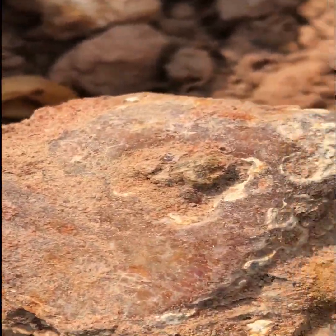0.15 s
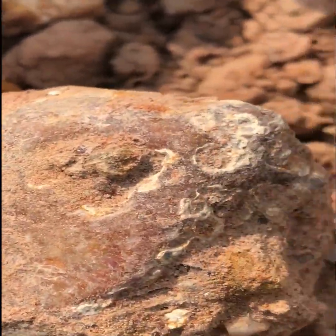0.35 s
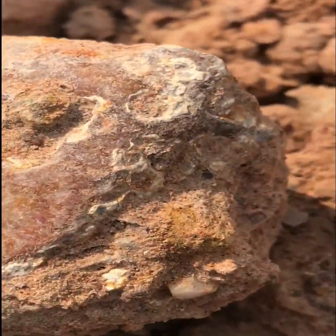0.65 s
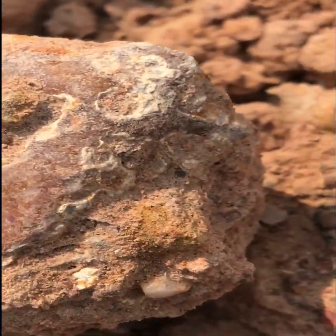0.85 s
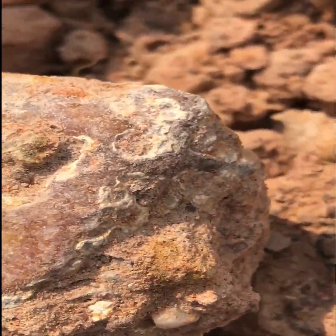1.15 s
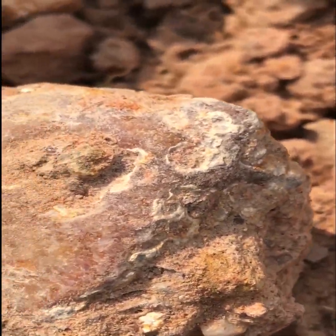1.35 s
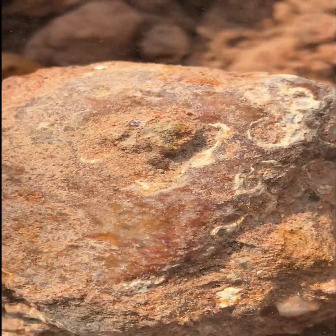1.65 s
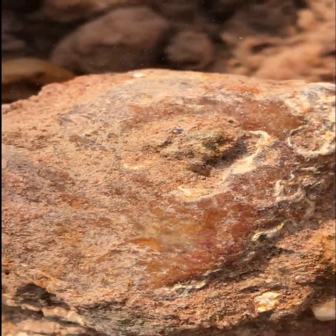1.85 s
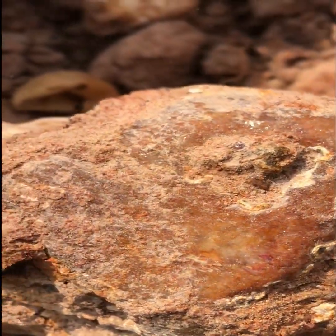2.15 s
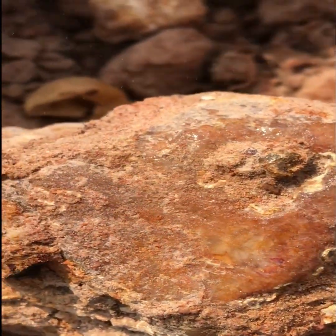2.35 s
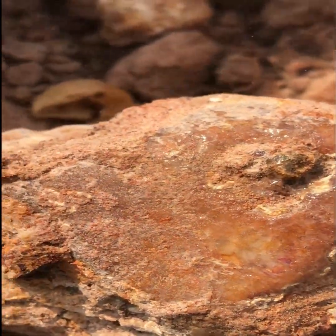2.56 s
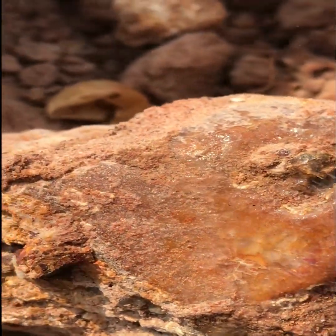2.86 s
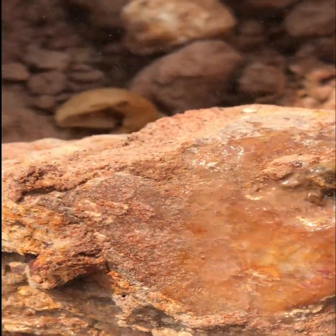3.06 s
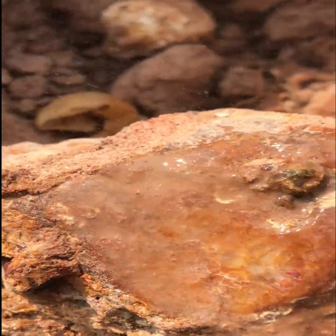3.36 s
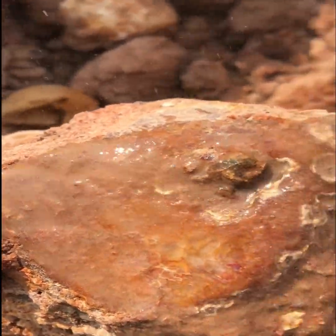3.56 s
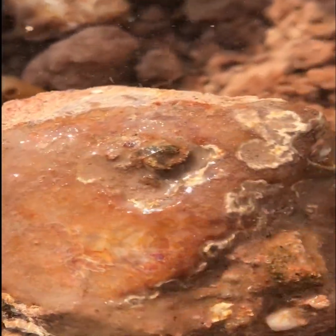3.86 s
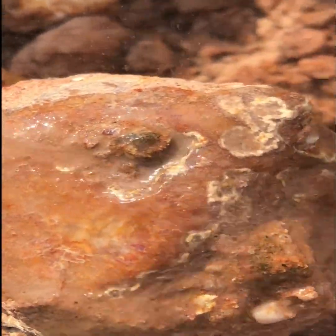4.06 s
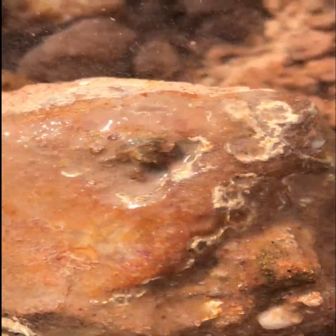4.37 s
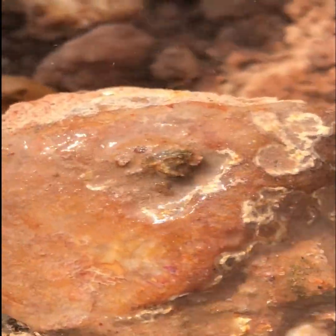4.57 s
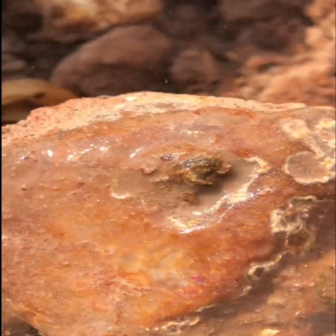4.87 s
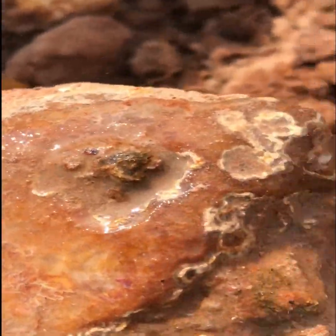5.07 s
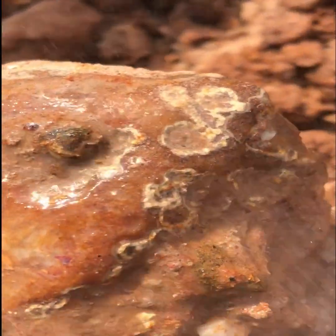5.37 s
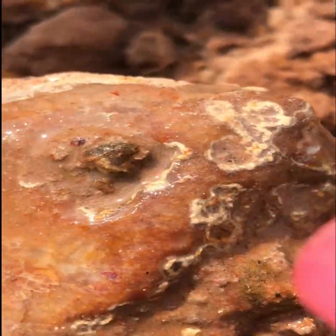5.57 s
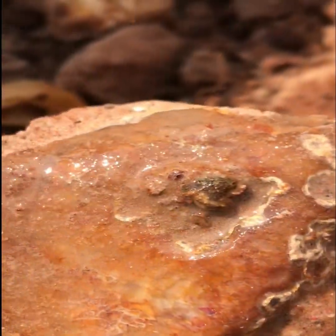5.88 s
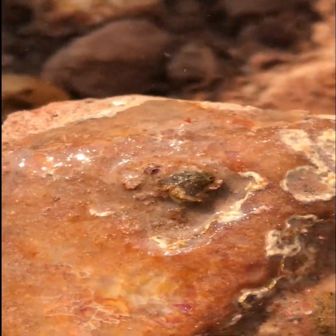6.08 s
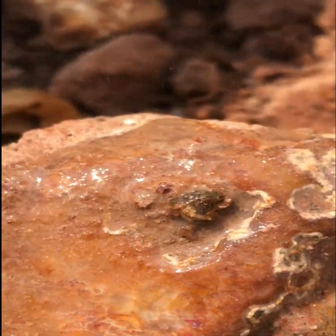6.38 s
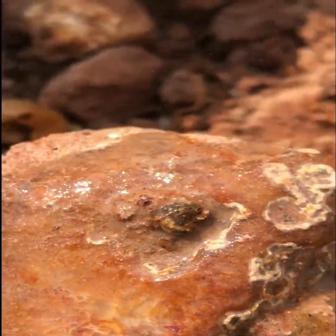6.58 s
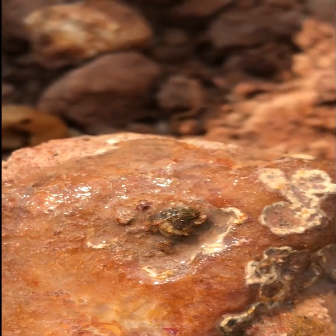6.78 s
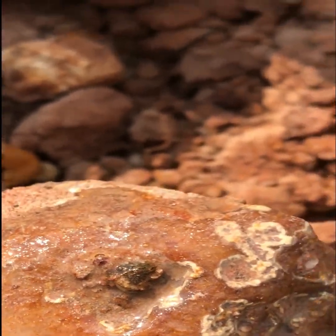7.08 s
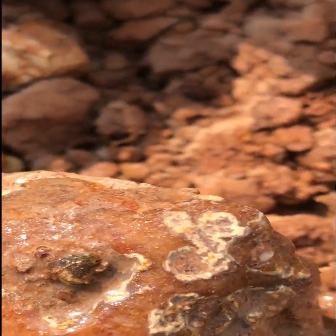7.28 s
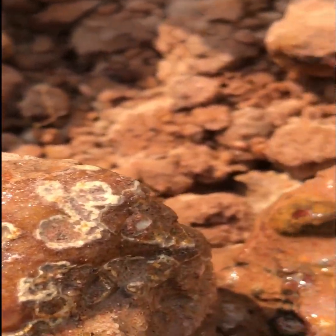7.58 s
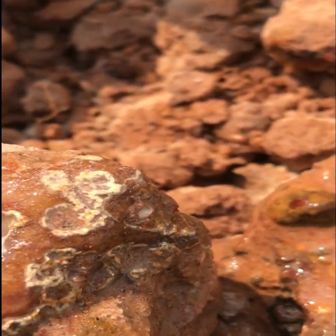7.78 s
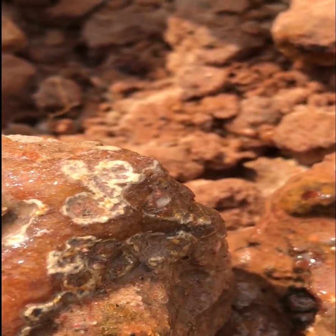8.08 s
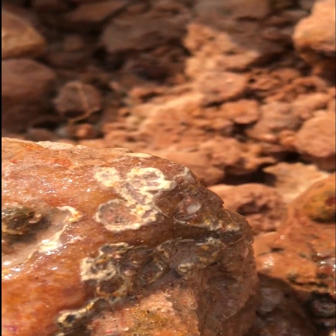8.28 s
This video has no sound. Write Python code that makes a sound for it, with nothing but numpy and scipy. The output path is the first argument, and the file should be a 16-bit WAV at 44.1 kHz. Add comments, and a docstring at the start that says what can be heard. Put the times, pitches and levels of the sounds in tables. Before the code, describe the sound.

Quick bright spritzes from a trigger sprayer splash on stone, valve ticking between them, framed by handling rustles, clicks and a knock.

```python
"""Hand spray bottle pumped fast onto a rock

Outdoors, a trigger is squeezed over and over: shaped noise hisses and splashes, broken by bright humps of spitting air.
Each release gurgles with random bubble pops and wheezes, while the valve ticks in decaying noise and ringing resonances.
Fingers snap, rustle and tick on plastic, the camera body is knocked, and the trigger hinge squeaks.
Swept low cycles bump the microphone as wind over rumble and faint hiss; a far bird sings swept sines with echoes."""
import sys
import numpy as np
from scipy import signal
from scipy.fft import rfft, irfft, next_fast_len
from scipy.io import wavfile
from scipy.ndimage import uniform_filter1d, minimum_filter1d, map_coordinates

SR = 44100
rng = np.random.default_rng(int(sys.argv[2]) if len(sys.argv) > 2 else 0)


def transcribe(u):
    """Save the signal u as a 16-bit wav file named by the first command-line argument.

    u: samples, shape (n,) or (channels, n), limited to [-1, 1]; the rate is SR.
    q: integer samples, one column per channel.
    """
    v = np.clip(np.atleast_2d(u).T, -1, 1)
    q = np.round(v * 32767).astype(np.int16)
    wavfile.write(sys.argv[1], SR, q)


N = 371763
T = np.arange(N) / SR  # time [s]

# trigger squeezes: start_s, end_s, air_s (until the last air is out), opening_db (hiss as the valve opens),
# full_db (hiss at full pressure), splash_db (base level of the splash)
SQUEEZES = [(1.576, 1.751, .036, -28, -29, -29), (1.88, 2.041, 0.11, -22, -22.5, -27.5),
            (2.181, 2.329, 0.12, -23, -18, -29), (2.459, 2.607, .073, -34, -18, -26.5),
            (2.747, 2.888, 0.089, -18.5, -18.5, -27), (3.007, 3.151, .057, -22, -17.5, -26),
            (3.269, 3.403, 0.093, -26, -20, -25.5), (3.516, 3.652, .09, -26, -22, -26),
            (3.766, 3.908, .033, -24, -20.5, -25), (4.019, 4.162, .068, -23.5, -20.5, -25),
            (4.273, 4.421, 0.036, -24.5, -19.5, -25.5), (4.538, 4.687, .061, -19.5, -19.5, -25.5),
            (4.81, 4.963, .066, -20, -18, -25.5), (5.094, 5.25, .046, -19, -17, -24.5),
            (5.378, 5.532, 0.066, -17.5, -17, -22.5), (5.646, 5.797, .084, -18, -17.5, -22),
            (5.92, 6.061, .077, -20, -18.5, -24.5), (6.179, 6.319, 0.07, -16.5, -16.5, -23.5)]
# relative colour of the nozzle noise: freq_hz, density_db (per Hz)
NOZZLE_COLOUR = [(1500, -25), (3000, -11), (5400, -5.5), (9200, -6), (12500, -3), (15300, 2.5),
                 (16500, -7.5)]
# relative colour of rustling cloth: freq_hz, density_db (per Hz)
CLOTH_COLOUR = [(470, -21), (800, -19.5), (2450, -26.5), (4090, -14.5), (4810, -16), (12200, -8),
                (15700, -1.5)]
# resonances of the pump head: freq_hz, width_hz, level_db
PUMP_MODES = [(162, 52, -5), (1360, 300, -5), (2790, 330, 3), (5140, 1500, 0), (9430, 740, 2.5)]


def amp(db):
    """Decibels to gain."""
    return 10 ** (np.asarray(db) / 20)


def unit(x):
    """Scaled to rms 1."""
    return x / np.sqrt(np.mean(x ** 2) + 1e-20)


def even(x):
    """Noise whose short-time loudness is held steady, so that a burst keeps its size."""
    power = np.abs(uniform_filter1d(x ** 2, size=130))
    return x / np.sqrt(power + 1e-3)


def filtered(x, response):
    """x shaped by a complex response of frequency, padded so that tails do not wrap."""
    m = next_fast_len(len(x) + 8192)
    spectrum = rfft(x, m) * response(np.fft.rfftfreq(m, 1 / SR))
    return irfft(spectrum, m)[:len(x)]


def ringing(modes):
    """Causal response of (freq_hz, width_hz, level_db) resonances with alternating sign."""
    def response(f):
        total = 0
        for k, (centre, width, db) in enumerate(modes):
            damping = 1j * f * width
            total = total + (-1) ** k * amp(db) * damping / (centre * centre - f * f + damping)
        return total
    return response


def rung_noise(modes):
    """White noise shaken through resonances, rms 1."""
    return unit(filtered(rng.standard_normal(N), ringing(modes)))


def wobble(rate_hz):
    """A smooth random curve with rate_hz knots a second."""
    knots = rng.standard_normal(int(N * rate_hz / SR) + 4)
    return map_coordinates(knots, [T * rate_hz])


def noise(colour, patchy_db=0., size=4):
    """Coloured noise of rms 1 with patches of random gain, smoothed over size frames of 1.5 ms."""
    z = signal.stft(rng.standard_normal(N), nperseg=128)[2]
    field = uniform_filter1d(rng.standard_normal(z.shape), size=4, axis=0)
    field = uniform_filter1d(field, size=size, axis=1)
    patchy = signal.istft(z * amp(patchy_db * unit(field)), nperseg=128)[1][:N]
    f, db = np.transpose(colour)
    return unit(filtered(patchy, lambda hz: amp(np.interp(np.log(hz + 1), np.log(f), db))))


def decays(rows, t60_s):
    """Envelope: a sudden rise at each (start_s, level_db), falling 60 dB in t60_s, cut off after 1/8 s."""
    env, t = np.zeros(N + SR), T[:SR // 8]
    for (s, db), life in zip(rows, np.broadcast_to(t60_s, len(rows))):
        env[round(s * SR):][:len(t)] += amp(db - 60 * t / life)
    return env[:N]


def swells(rows, power=2):
    """Envelope: a hump at each (centre_s, level_db, half_s); a higher power flattens its top."""
    env = np.zeros(N)
    for s, db, half in rows:
        near = slice(max(0, int((s - 4 * half) * SR)), int((s + 4 * half) * SR))
        env[near] += amp(db) * np.exp(-np.abs((T[near] - s) / half) ** power)
    return env


def stroke(levels_db):
    """Gain through every squeeze: the valve snaps open, pressure drains away at the end."""
    # stages of a stroke, as shares of its length
    stages = [.1, .3, .55, .8]
    start, end = np.array(SQUEEZES)[:, :2].T[:, :, None]
    times = start + (end - start) * np.r_[0, .018, stages, 1, 1.08, 1.2]
    first, last = levels_db[:, :1], levels_db[:, -1:]
    silent = 0 * first
    gains = np.c_[silent, amp(np.c_[first, levels_db, last - 12, last - 24]), silent]
    return np.interp(T, times.ravel(), gains.ravel())


def air():
    """Far outdoor hiss: steady coloured noise."""
    # relative colour of the far hiss: freq_hz, density_db (per Hz)
    air_colour = [(120, -45), (200, -5.5), (500, -11.5), (1150, -15), (5000, -19.5), (8300, -17),
                  (15700, -19.5)]
    return amp(-58.5) * noise(air_colour)


def wind():
    """Turbulence at the microphone: a lumpy low rumble and single pressure swings."""
    # gust bumps: start_s (12 ms ahead of the centre), level_db, pitch_hz (at the centre)
    gusts = [(0.921, -39.5, 148), (2.661, -42.5, 63.3), (4.199, -45, 49), (4.442, -45, 57),
             (5.476, -29.5, 53.8), (5.657, -36.5, 48.4), (6.07, -29.5, 70.6), (6.149, -40, 56),
             (6.376, -20.5, 80.5), (6.406, -20.5, 59.2), (6.447, -37, 61.9), (6.5, -27, 97),
             (6.54, -28, 77), (6.569, -43, 45.8), (6.688, -34.5, 56), (6.8, -34, 59.2), (7.762, -44, 43.1),
             (7.929, -44, 70.4), (8.047, -33, 84)]
    # relative colour of the rumble: freq_hz, density_db (per Hz)
    rumble_colour = [(15, -40), (35, -11), (65, 2.5), (103, -8.5), (140, -8), (220, -21), (600, -63)]
    # the air is turbulent around every bump
    stirred = swells([(s + 0.01, db - 14, 0.041) for s, db, hz in gusts])
    lumpy = unit(amp(1.9 * wobble(22)) * noise(rumble_colour))
    bumps = np.zeros(N)
    for s, db, hz in gusts:
        near = slice(int((s - .1) * SR), int((s + .12) * SR))
        cycles = hz * (T[near] - s - .012)
        # a pressure swing of a couple of cycles that slows as it passes
        swing = np.sin(2 * np.pi * (cycles - 0.23 * cycles ** 2))
        bumps[near] += amp(db) * np.exp(-(cycles / 0.79) ** 2) * swing
    return (amp(-54.5) + stirred) * lumpy + bumps


def rustle():
    """Cloth and skin rub on plastic: grainy noise in swells over a faint floor of cloth."""
    # swells of handling noise: centre_s, half_s, cloth_db, skin_db
    rustles = [(0.024, 0.013, -50, -38), (0.124, 0.041, -43.5, -51), (.29, 0.055, -48, -70),
               (.43, .03, -49.5, -68), (0.817, 0.06, -54, -50), (0.957, 0.05, -57, -49),
               (7.064, 0.067, -44.5, -46.5), (7.304, 0.11, -54, -53.5), (7.83, 0.064, -50.5, -82),
               (8.026, 0.039, -39, -66), (8.124, 0.038, -41.5, -77), (8.251, 0.057, -36, -50.5)]
    # relative colour of skin on plastic: freq_hz, density_db (per Hz)
    skin_colour = [(100, 16), (300, 3), (1000, -4.5), (3000, -9), (6000, -20), (12000, -42)]
    cloth_env = amp(-55.0) + swells([(s, cloth_db, half) for s, half, cloth_db, _ in rustles])
    skin_env = swells([(s, skin_db, half) for s, half, _, skin_db in rustles])
    grain = unit(amp(3.4 * wobble(250)))
    return grain * (cloth_env * noise(CLOTH_COLOUR, patchy_db=1) + skin_env * noise(skin_colour, patchy_db=1.0))


def knocks():
    """Knocks shake the camera: its shell rattles during the contact, then the whole body swings low."""
    # knocks on the camera body: start_s, swing_db and rattle_db (both before their contact shapes)
    hits = [(0.01, -21.5, -53), (7.023, -10.5, -24), (7.074, -36, -45)]
    # resonances of the camera shell: freq_hz, width_hz, level_db
    shell_modes = [(653, 260, -8.5), (1763, 75, 2.5), (3080, 2200, -20)]
    swing_hz, swing_t60_s, swing_rise_s = 150, 0.067, .011
    rattle = even(rung_noise(shell_modes))
    out = np.zeros(N)
    for s, db, rattle_db in hits:
        t = np.clip(T - s, 0, None)
        out += amp(rattle_db) * (t / 0.006) * np.exp(1 - t / 0.0043) * rattle
        rise = 1 - np.exp(-(t / swing_rise_s) ** 4)
        out += amp(db - 60 * t / swing_t60_s) * np.sin(2 * np.pi * swing_hz * (t - .003)) * rise
    return out


def snaps():
    """Finger snaps ring the bottle wall: a sharp short blow with a weaker, longer tail."""
    # finger snaps on the bottle: start_s, blow_db, t60_s (of the tail)
    hits = [(0.0982, -28, 0.088), (.4072, -14.5, 0.057), (1.558, -41, 0.043), (7.335, -43.5, 0.1)]
    # resonances of the bottle wall: freq_hz, width_hz, level_db
    wall_modes = [(600, 4000, -19), (1647, 97, 3.5), (2400, 110, 7), (3240, 1000, 1.5), (5800, 1000, -4),
                  (8550, 1100, -15)]
    s, db, t60_s = np.transpose(hits)
    blows = decays(np.c_[s, db], 0.14 * t60_s) + decays(np.c_[s, db - 9], t60_s)
    return blows * even(rung_noise(wall_modes))


def fidgets():
    """Bright ticks of handling: each a very short click of noise with a longer tail."""
    # ticks: start_s, level_db (of the tail)
    ticks = [(0.214, -37.5), (0.2867, -48), (0.557, -38), (0.9443, -33), (7.0628, -33), (7.2412, -31),
             (7.3736, -30.5), (7.9582, -32), (7.9892, -39), (8.0247, -32), (8.1081, -24), (8.2222, -33),
             (8.2628, -32), (8.3419, -40)]
    env = 1.27 * decays(ticks, 0.0028) + decays(ticks, 0.027)
    return env * even(noise(CLOTH_COLOUR, patchy_db=6.5))


def squeaks():
    """The trigger hinge squeaks: decaying noise in one broad resonance."""
    # squeaks: start_s, level_db
    hinge = [(.942, -44), (.977, -43), (1.145, -52.5), (6.36, -42.5)]
    return decays(hinge, 0.092) * rung_noise([(2930, 630, 0)])


def jet_flutter():
    """Flow of the jet, which flutters as it breaks into drops and drops out where it gulps air."""
    start, air_s = np.array(SQUEEZES)[:, [0, 2]].T
    gulp_s, gulp_scatter_s, gulp_half_s, share_lost = 0.018, 0.0033, 0.0027, 0.57
    # the flow sputters deeply while air is still in the nozzle, then only shivers
    airy = np.searchsorted(np.c_[start, start + air_s].ravel(), T) % 2
    flutter = amp(airy * (2.43 * wobble(200) + 2.5 * wobble(600)) + 1.5 * wobble(500))
    flutter /= np.sqrt(np.abs(uniform_filter1d(flutter ** 2, size=900)))
    # soon after opening the jet gulps air
    gulps = start + gulp_s + gulp_scatter_s * rng.standard_normal(len(start))
    gulping = swells([(s, 0, gulp_half_s) for s in gulps])
    return flutter * np.clip(1 - share_lost * gulping, 0, 1)


def jet(flutter):
    """The nozzle hisses with the pressure; air pockets burst out as short bright spits."""
    # loud air pockets: centre_s, level_db, half_width_ms
    loud_spits = [(1.594, -15.5, 2.2), (1.688, -12, 1), (1.753, -19, 2.7), (1.896, -12, 2.2),
                  (1.926, -13, 1.6), (1.96, -8, 1.2), (1.969, -10, 1.1), (1.991, -12, 2.6),
                  (2.259, -3, 1.6), (2.294, -9, 0.88), (2.473, -21, 5), (2.514, -12, 1.3),
                  (2.526, -6.5, 6.3), (2.774, -12, 3.1), (2.829, -6, 2.5), (3.022, -20, 2),
                  (3.053, -1, 1.1), (3.06, -9, 1.1), (3.278, -19, 1.6), (3.335, -13, 1.2), (3.356, -7, 3),
                  (3.576, -7, 4.4), (3.601, -11, 1.2), (3.793, -16, 2), (4.033, -9, 1.7), (4.083, 2, 3.7),
                  (4.283, -11.5, 2.1), (4.297, -15, 1.4), (4.594, -4, 3), (4.873, -8, 1.6), (5.135, -5, 2),
                  (5.387, -10.5, 4.3), (5.404, -15, 3), (5.412, -3, 1), (5.441, -6, 0.68),
                  (5.541, -22.5, 1.1), (5.725, -9, 2.7), (5.938, -9, 1.7), (5.97, -8, 1.5), (5.98, -7, 2),
                  (6.201, -3, 2.3), (6.244, -7, 1.5)]
    # relative colour of the spits: freq_hz, density_db (per Hz)
    spit_colour = [(2500, -26.5), (6000, -10), (9500, -10.5), (12500, -5.5), (15700, 4.5), (16100, -8)]
    # the hiss sags as the piston slows: level_db against full pressure at the last two stages
    sag_db = [-1.5, -5.5]
    start, _, air_s, opening_db, full_db, _ = np.transpose(SQUEEZES)
    # small pockets come at random, four a squeeze, before the air is out
    small_db, small_scatter_db, small_half_ms = -13.5, 3, 0.71
    shape = (len(SQUEEZES), 4)
    pocket_s = start[:, None] + air_s[:, None] * rng.random(shape)
    pocket_db = small_db + small_scatter_db * rng.standard_normal(shape)
    pocket_db += (full_db - full_db.mean())[:, None]  # stronger squeezes spit louder
    small_spits = [(s, db, small_half_ms) for s, db in zip(pocket_s.ravel(), pocket_db.ravel())]
    spit_env = swells([(s, db, ms / 1000) for s, db, ms in loud_spits + small_spits], power=3)
    pressure = stroke(np.c_[opening_db, full_db, full_db[:, None] + sag_db])
    hiss = pressure * flutter * noise(NOZZLE_COLOUR, patchy_db=3.0, size=20)
    return hiss + spit_env * even(noise(spit_colour, patchy_db=2.5))


def splash(flutter):
    """Drops patter on the rock: a bright part swells late in the stroke, a dull part from the pooled film."""
    # relative colour of the splash: freq_hz, density_db (per Hz)
    splash_colour = [(200, -17), (500, -15.5), (1000, -9), (2000, -3.5), (4400, -3.5), (10000, -6),
                     (16000, -12.5)]
    splash_db = np.array(SQUEEZES)[:, 5:]
    # the bright part builds up as the surface floods, then eases
    wetting = stroke(splash_db + [-5.0, -4.0, 1.3, -5.0])
    # drops landing in the film sound duller; this part sags, then is strongest at the end
    pooling = stroke(splash_db + [-2, -3.5, -6.5, -1.0])
    drops = noise(splash_colour, patchy_db=1.5, size=30)
    dull = filtered(drops, lambda hz: 1 / (1 + (hz / 1800) ** 4))
    return np.sqrt(flutter) * (wetting * (drops - dull) + pooling * dull)


def trigger_thuds():
    """The trigger thuds as it is pulled: a burst of noise drives the lowest pump resonance."""
    pulls = decays([(row[0], -11.5) for row in SQUEEZES], 0.14) * rng.standard_normal(N)
    return filtered(pulls, ringing(PUMP_MODES[:1]))


def valve_ticks(returns):
    """The valve ball ticks: a crack of nozzle noise and a longer ring of the pump head."""
    # order of ticks in every return: after_s (from the valve click), crack_db (against the click),
    # ring_db (against the crack)
    tick_order = [(-.03, -3.5, -11), (-.0155, -4, -9.5), (0, 0.5, -3.5), (.0063, -5.5, -2.5),
                  (.032, -17, -4.5)]
    # stray ticks, mostly just before a pull: start_s, crack_db, ring_db (against the crack)
    strays = [(1.86, -39, -20), (3.263, -39, -8), (3.749, -43, -10), (3.758, -44, 16), (5.365, -59, -13),
              (6.17, -36, -12)]
    scatter_s, scatter_db = 0.00091, 2.5
    ticks = [(s + after, db + less, ring) for s, db, _ in returns for after, less, ring in tick_order]
    # the valve cracks open 3 ms after the pull, 1.5 dB over the opening hiss
    ticks += [(row[0] + .003, row[3] + 1.5, -6) for row in SQUEEZES]
    s, db, ring_db = np.transpose(ticks + strays)
    late, loud = rng.standard_normal((len(s), 2)).T
    s, db = s + scatter_s * late, db + scatter_db * loud
    crack = decays(np.c_[s, db], 0.0089) * even(noise(NOZZLE_COLOUR, patchy_db=7.5))
    shake = decays(np.c_[s, db + ring_db], 0.019) * rung_noise(PUMP_MODES)
    return crack + shake


def suction(returns):
    """Liquid gurgles in as bubbles snap over a soft flow, while air wheezes through the vent."""
    # relative colour of the gurgle: freq_hz, density_db (per Hz)
    suction_colour = [(300, -19), (600, -4), (2700, -6.5), (6000, -8), (15800, -9)]
    drawing = 0
    for s, _, db in returns:
        half_s = np.where(T < s, .03, .04)
        drawing = drawing + amp(db) * np.exp(-((T - s) / half_s) ** 2)
    # the wheeze lasts for the whole return
    venting = swells([(s + .004, db - 10 + 3 * rng.standard_normal(), .036) for s, _, db in returns], power=5.8)
    # tiny bubbles snap at random moments, 300 a second on average
    pops = (rng.random(N) < 300 / SR) * amp(3 * rng.standard_normal(N))
    popping = signal.fftconvolve(pops, amp(-60 * T[:SR // 20] / 0.0094))[:N]
    gurgle = unit((.25 + popping) * noise(suction_colour, patchy_db=1.5))
    whistle = rung_noise([(2700, 140, 0)])
    return drawing * gurgle + venting * unit(1.5 + popping) * whistle


def pump():
    """The trigger thuds when pulled; on its way back the valve ticks and liquid is drawn up."""
    # trigger returns: click_s, click_db (reference for its ticks), suction_db
    returns = [(1.804, -32, -41), (2.098, -26, -42), (2.383, -27.5, -42.5), (2.662, -24.5, -45),
               (2.944, -28, -44.5), (3.22, -28, -42), (3.463, -28, -47), (3.706, -27, -45.5),
               (3.961, -25, -42), (4.22, -25, -45), (4.475, -24, -46), (4.747, -25.5, -42.5),
               (5.026, -23.5, -44), (5.31, -27, -39.5), (5.59, -22, -38), (5.858, -27.5, -40.5),
               (6.116, -27, -43), (6.377, -35, -44)]
    return trigger_thuds() + valve_ticks(returns) + suction(returns)


def bird():
    """A far bird sings a two-note chirp twice: a gliding sine smeared by scattered echoes."""
    # one chirp: after_s (from its start), pitch_hz, level_db (before the distance mix)
    chirp = [(0, 5500, -72), (0.013, 5600, -50), (0.021, 6200, -54), (.028, 4450, -70), (.038, 5100, -49),
             (.056, 6400, -48.5), (.07, 6670, -62)]
    # start of each chirp: start_s
    chirp_starts = [7.531, 7.674]
    after, hz, db = np.transpose(chirp)
    song = np.zeros(N)
    for s in chirp_starts:
        phase = 2 * np.pi * np.cumsum(np.interp(T - s, after, hz)) / SR
        song += amp(np.interp(T - s, after, db, left=-140, right=-140)) * np.sin(phase)
    echoes = rng.standard_normal(SR // 4) * amp(-60 * T[:SR // 4] / 0.11)
    smeared = signal.fftconvolve(song, echoes / np.linalg.norm(echoes))[:N]
    return amp(-3.0) * song + amp(-6) * smeared


def scene():
    """Everything reaches one microphone."""
    surroundings = air() + wind() + bird()
    hands = rustle() + knocks() + snaps() + fidgets() + squeaks()
    flutter = jet_flutter()
    spray = jet(flutter) + splash(flutter)
    return (surroundings + hands + spray + pump())[None]


def record(dry):
    """Microphone colour, a fast limiter on the loudest peaks, then the band limit."""
    # dips in the microphone's response: freq_hz, width_hz, level_db
    mic_dips = [(4885, 170, -3.5), (7670, 480, -3), (10500, 410, -5)]
    ceiling, top_hz, edge_hz = .95, 15880, 200
    coloured = filtered(dry[0], lambda hz: amp(sum(db * np.exp(-((hz - c) / w) ** 2) for c, w, db in mic_dips)))
    needed = np.minimum(1, ceiling / (np.abs(coloured) + 1e-9))
    # hold the lowest gain for 2 ms and smooth it over 1 ms
    limited = coloured * uniform_filter1d(minimum_filter1d(needed, size=88), size=44)
    return filtered(limited, lambda hz: np.clip((top_hz - hz) / edge_hz + .5, 0, 1) ** 2)[None]


dry = scene()
out = record(dry)
transcribe(out)
```